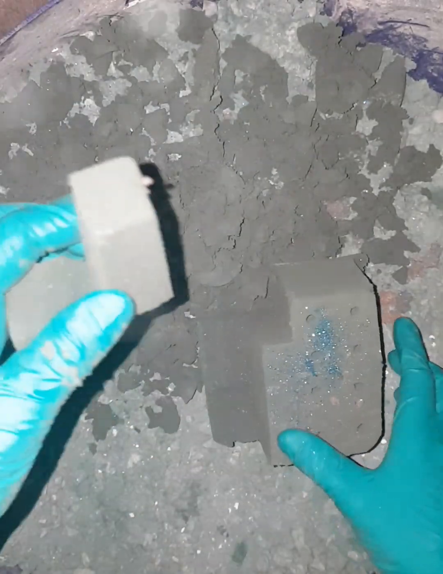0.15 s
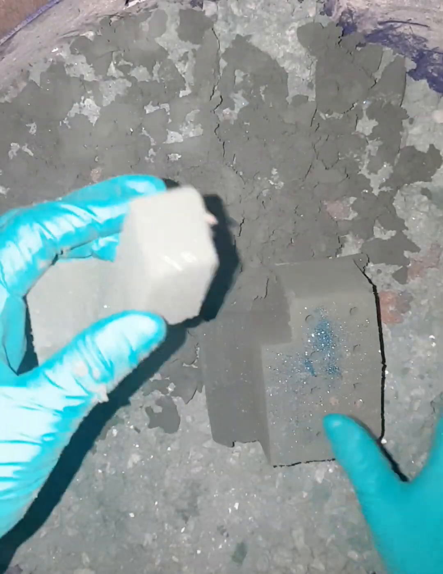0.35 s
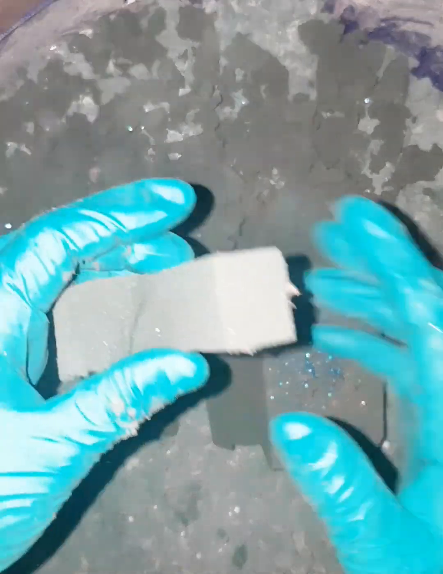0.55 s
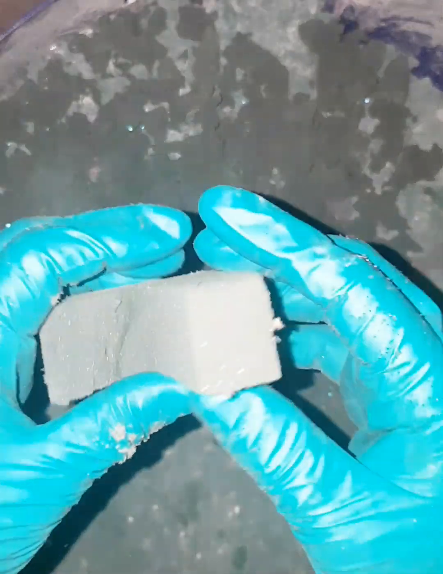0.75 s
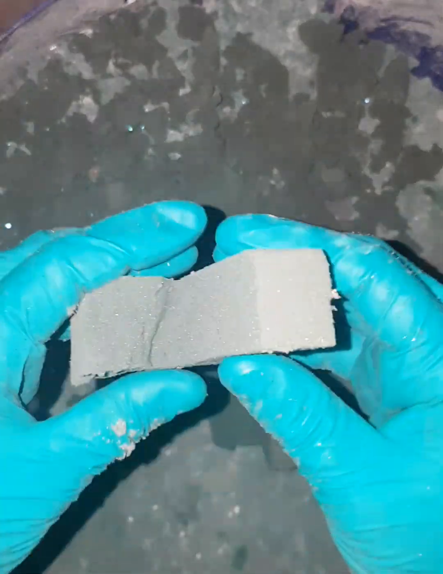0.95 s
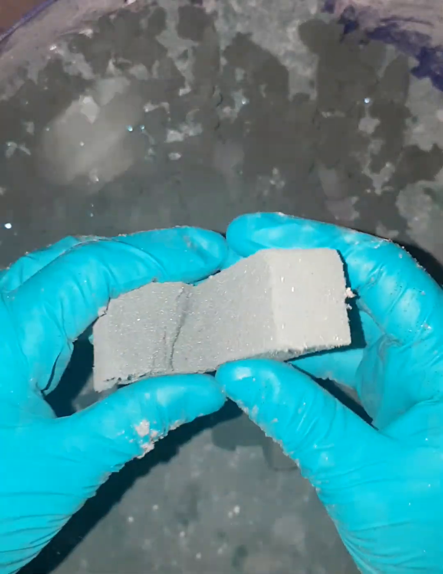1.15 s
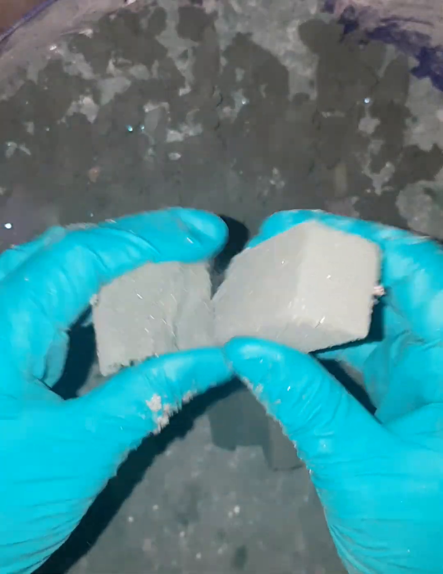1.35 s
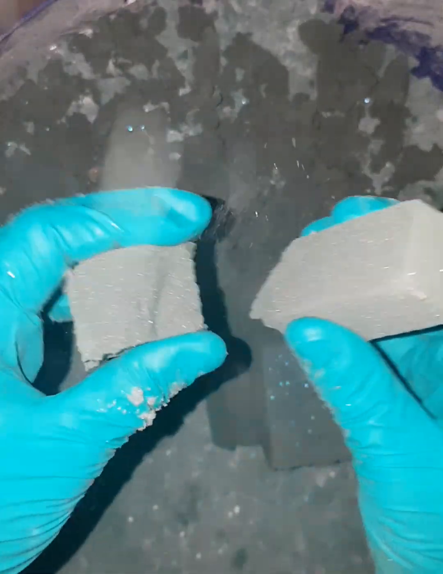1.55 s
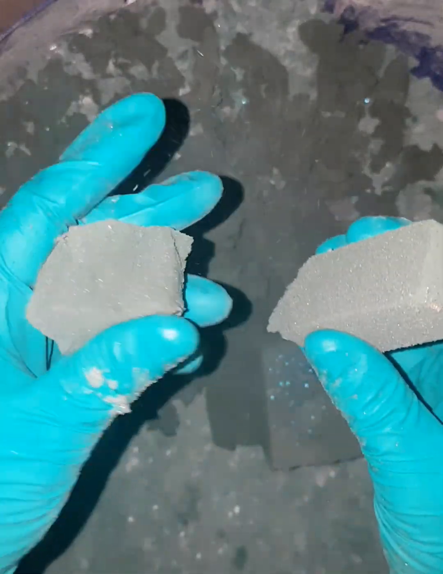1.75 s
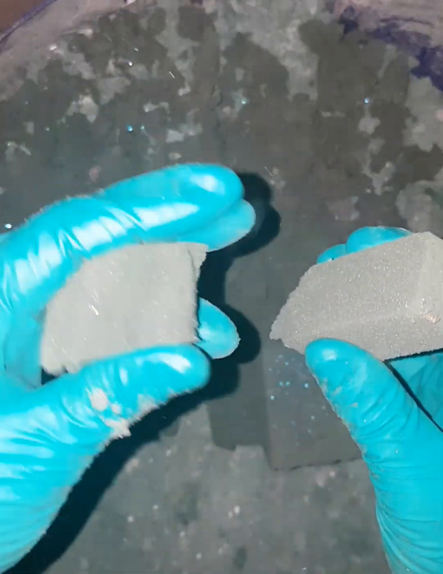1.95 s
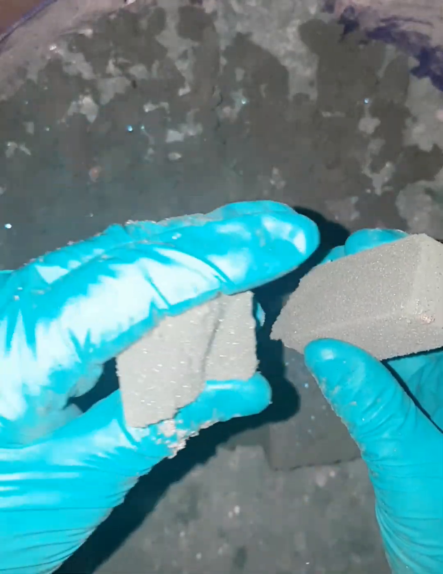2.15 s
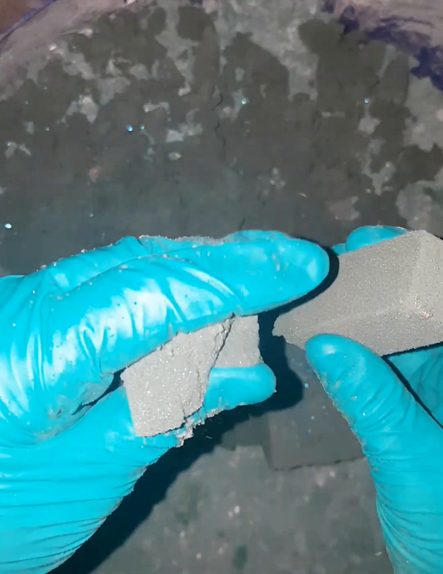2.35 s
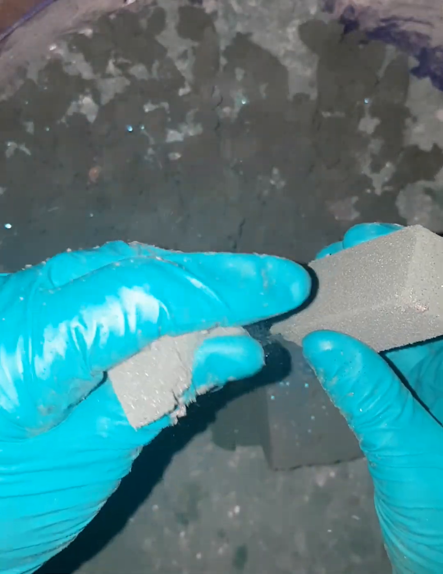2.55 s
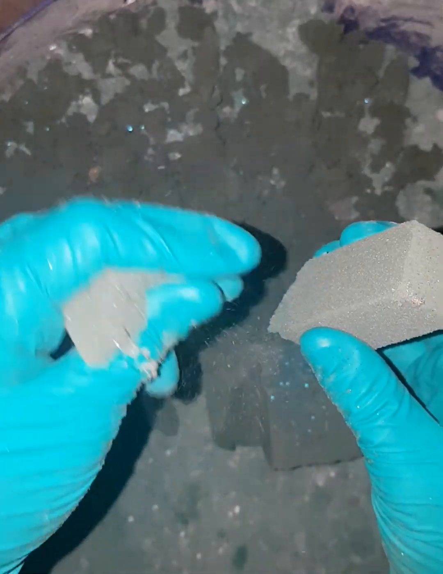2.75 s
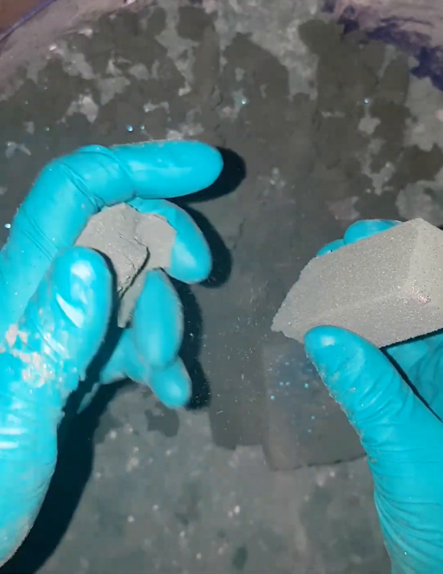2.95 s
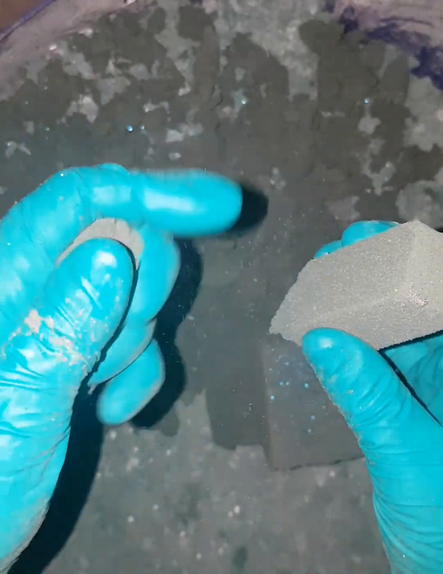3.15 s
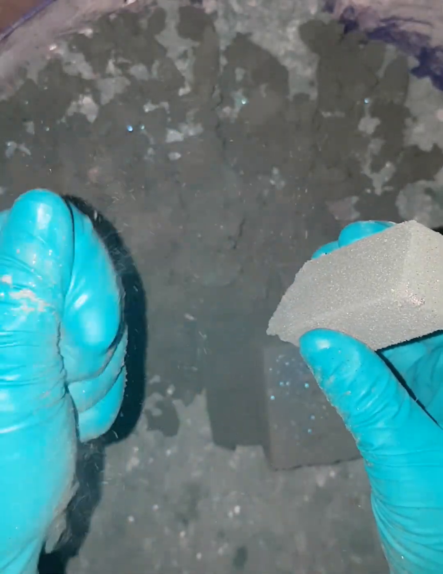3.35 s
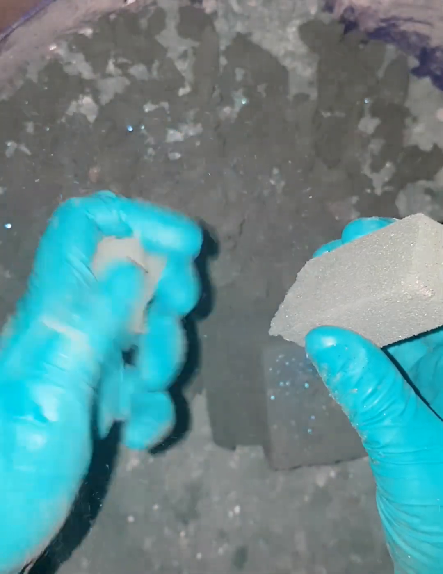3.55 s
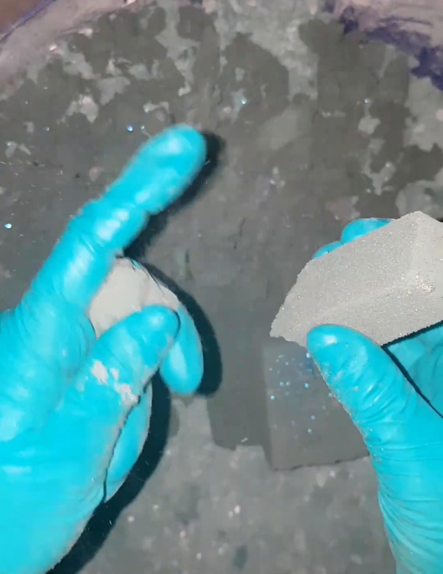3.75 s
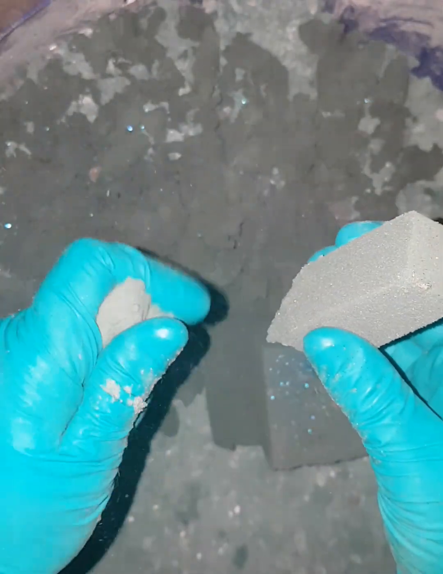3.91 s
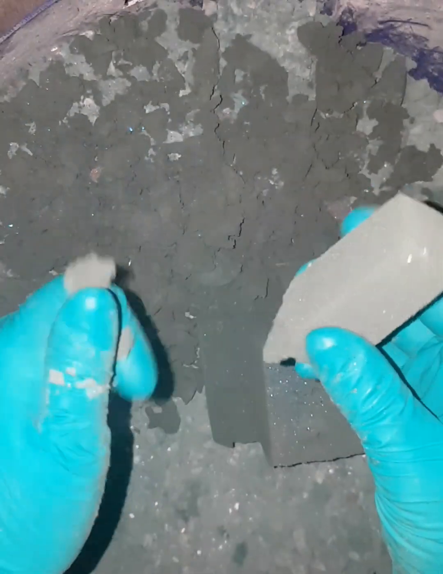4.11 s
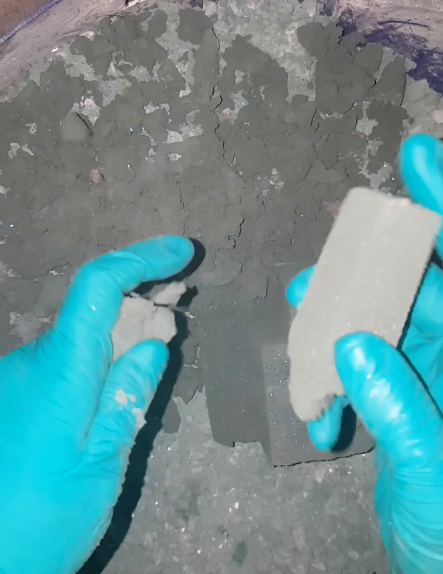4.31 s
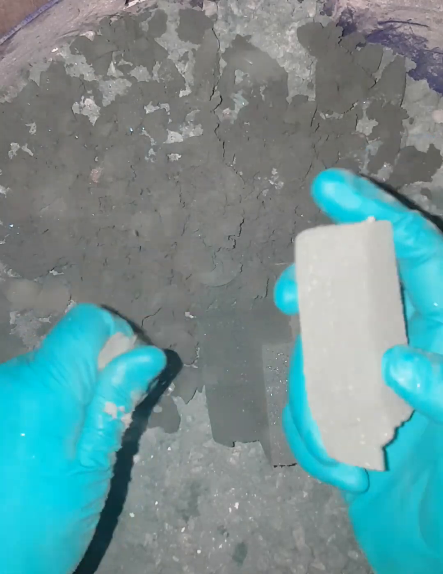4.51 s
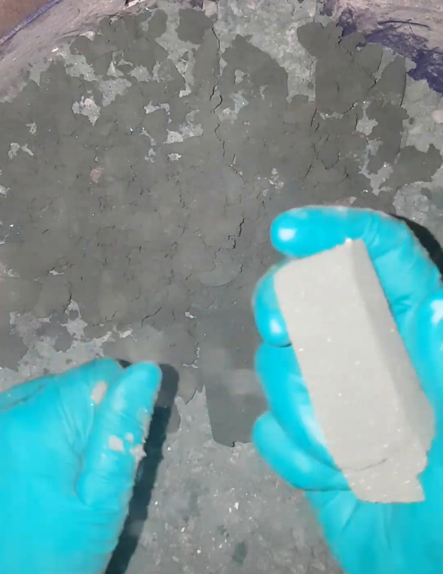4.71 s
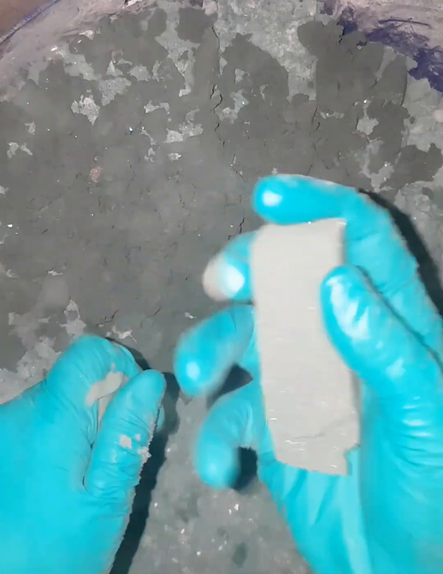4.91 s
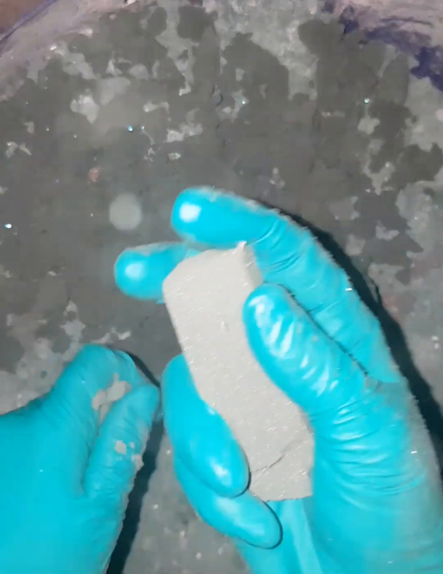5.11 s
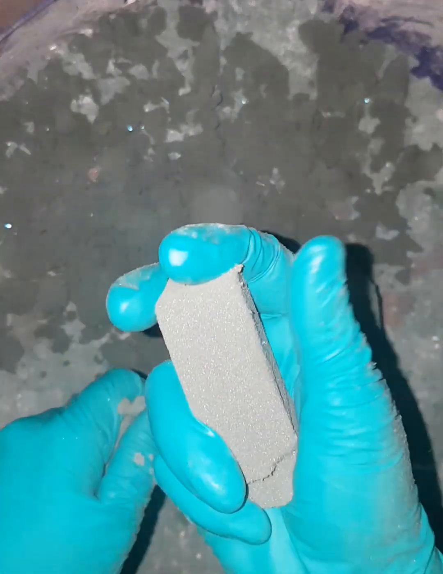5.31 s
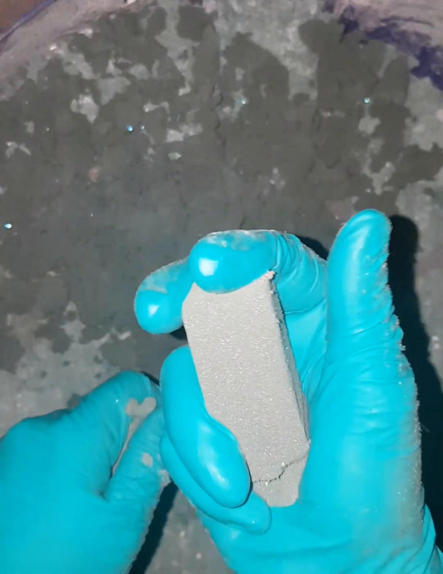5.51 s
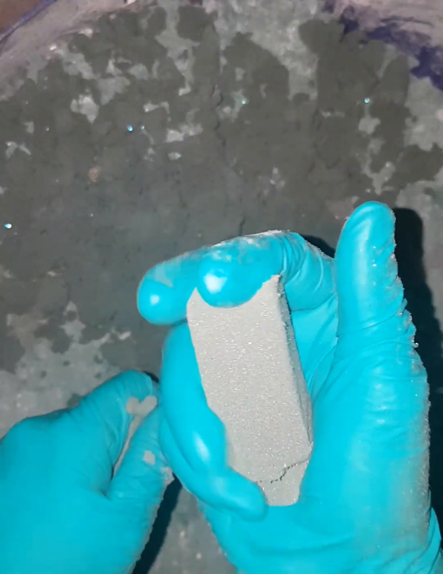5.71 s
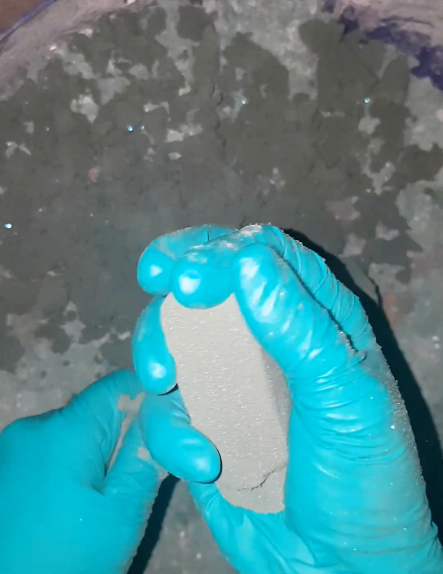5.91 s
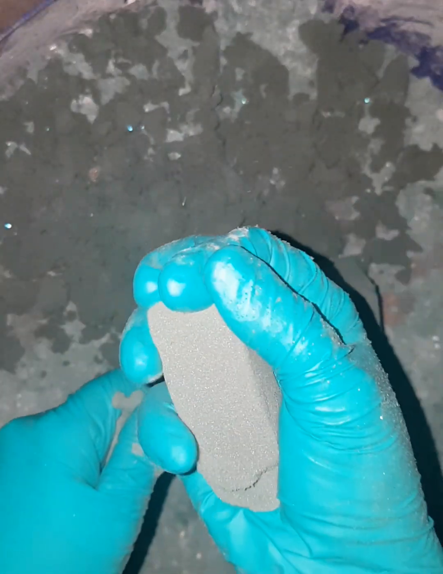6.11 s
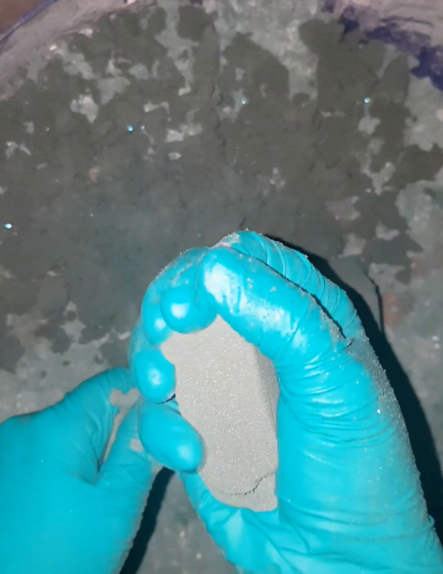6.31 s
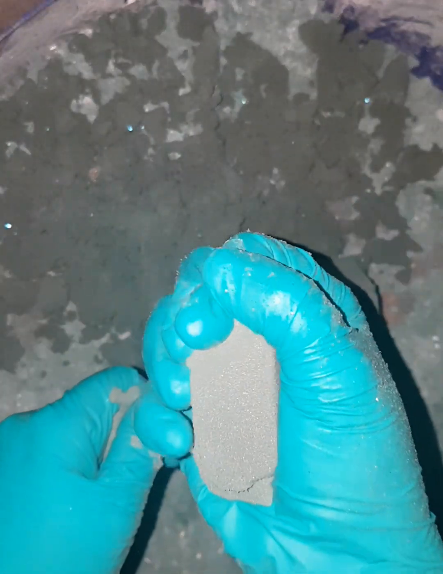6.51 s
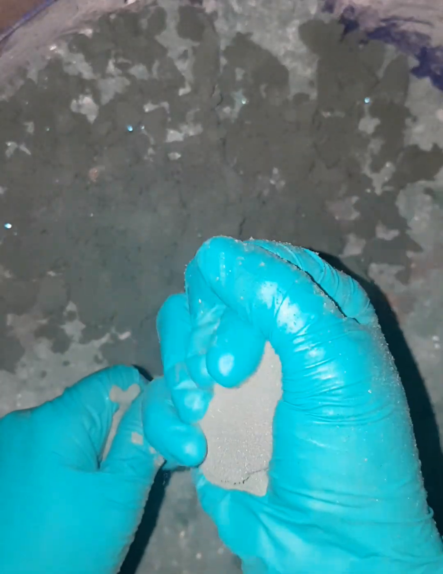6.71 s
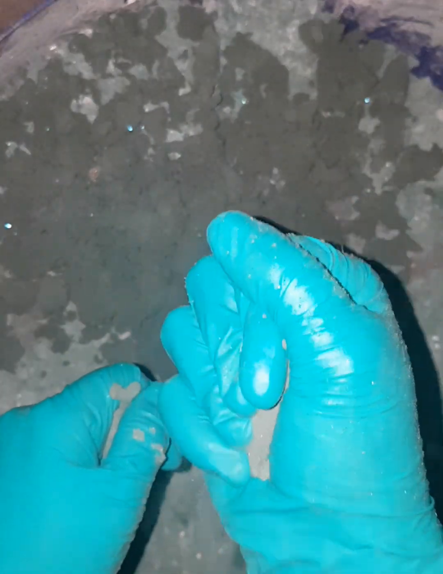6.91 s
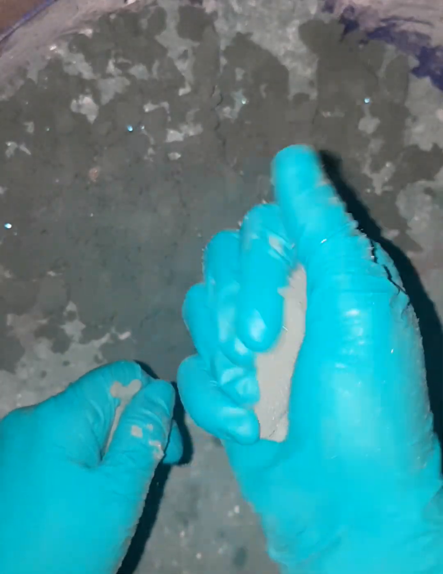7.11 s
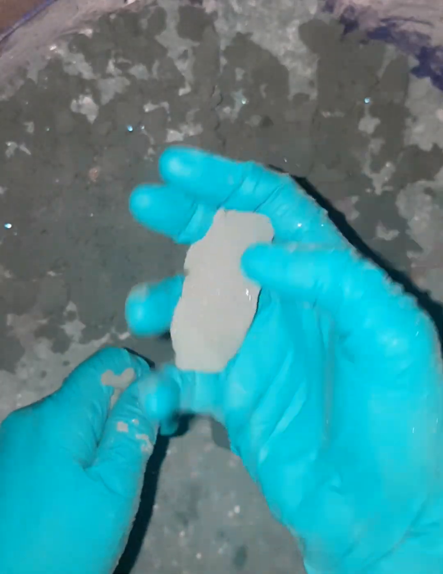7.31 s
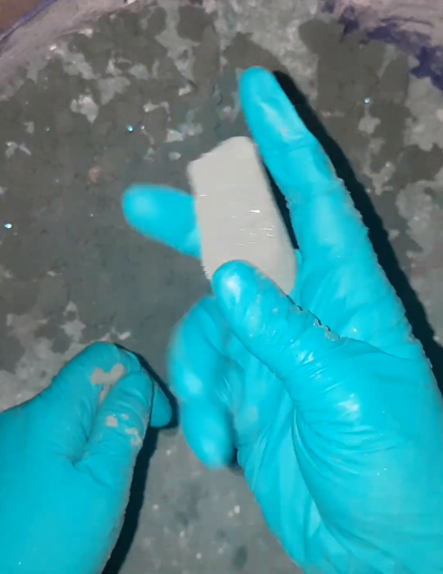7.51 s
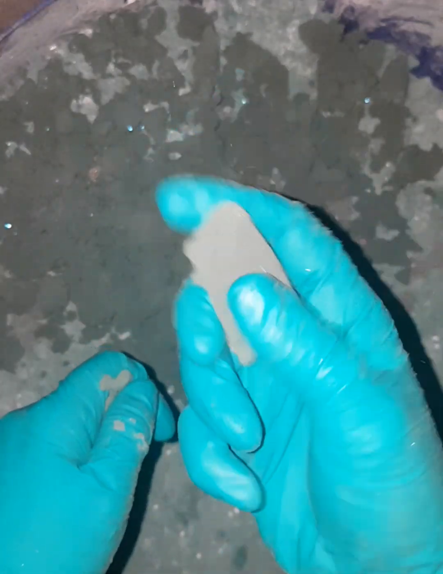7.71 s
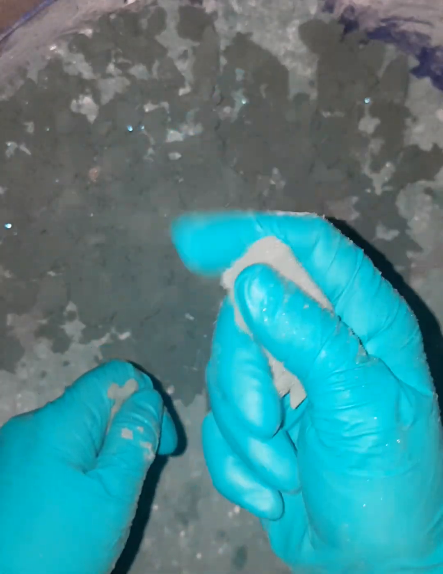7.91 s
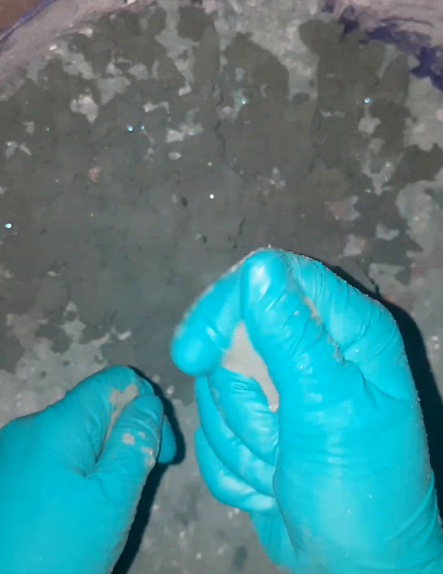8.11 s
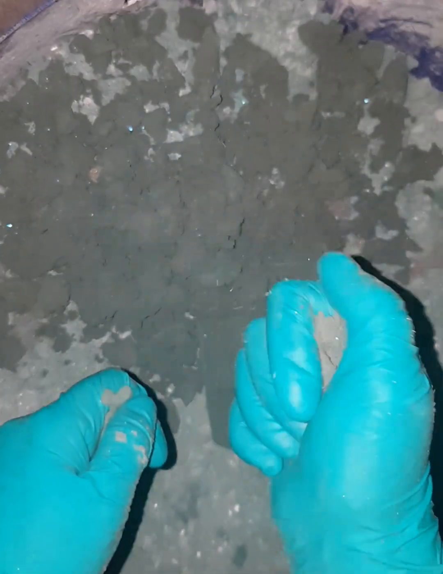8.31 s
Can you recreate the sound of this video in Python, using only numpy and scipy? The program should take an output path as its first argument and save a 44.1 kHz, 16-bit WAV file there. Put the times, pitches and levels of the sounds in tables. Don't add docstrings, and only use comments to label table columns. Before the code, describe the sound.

Very close, dry and mono: soft foam scratching swells into creaky crackle, then a bright splintering snap. Sandy crunches and small pops follow as one piece is squeezed, fading to light rubbing. A second squeeze builds through separate hard cracks to a crowded, full-scale crunch, then drops to brief papery scuffs over low room hum and microphone hiss.

```python
import sys
import numpy as np
from scipy import signal
from scipy.fft import rfft, irfft, next_fast_len
from scipy.io import wavfile
from scipy.ndimage import uniform_filter1d, map_coordinates

SR = 44100
rng = np.random.default_rng(int(sys.argv[2]) if len(sys.argv) > 2 else 0)


def bounce(signal):
    frames = np.transpose(np.atleast_2d(signal))
    limited = np.clip(frames, -1, 1)
    pcm = np.round(limited * 32767).astype(np.int16)
    wavfile.write(sys.argv[1], SR, pcm)


def ratio(d):
    e = np.asarray(d, float) / 20
    return 10 ** e


N = 368676
SLIT_HZ = 6350


def unit(x):
    return x / np.sqrt(np.mean(x ** 2) + 1e-20)


def along(points, hz):
    f, v = np.transpose(points)
    return np.interp(np.log(hz + 1), np.log(f + 1), v)


def curves(rows):
    s, *cols = np.transpose(rows)
    return [np.interp(np.arange(N) / SR, s, c) for c in cols]


def wobble(rate):
    knots = rng.standard_normal(int(N * rate / SR) + 4)
    return map_coordinates(knots, [np.arange(N) * rate / SR])


def filtered(x, response):
    m = 2 * next_fast_len(len(x) // 2 + 2048)
    return irfft(rfft(x, m) * response(np.fft.rfftfreq(m, 1 / SR)), m)[..., :len(x)]


def band(lo, hi):
    return lambda hz: 1 / np.sqrt((1 + (lo / (hz + 1)) ** 12) * (1 + (hz / hi) ** 12))


def resonance(centre_hz, width):
    return lambda f: 1j * f * width / (centre_hz ** 2 - f * f + 1j * f * width)


def crackle():
    grain_bands = [
        (2100, 5500),
        (5500, 9000),
        (9000, 11000),
        (250, 2100),
        (11000, 17000),
    ]
    # time in seconds, ring of the hollow hand in Hz, its strength in dB,
    # grit from 0 (rubbing) to 1 (crushing).
    grip = [(0, 4600, -3, 0.33), (.55, 4560, 5, .27), (.62, 2720, 7, 0.31), (.86, 2720, 3, .35),
            (1.15, 2720, -14.5, 0.52), (1.3, 4510, -5, 0.53), (1.9, 2960, 2.5, .2), (2.3, 3250, -1, .3),
            (2.5, 4900, -20, 0.33), (2.85, 3550, -7, 0.21), (3.9, 3200, 1.5, .16), (4.17, 4500, -7, .17),
            (4.22, 4550, 9.5, 0.19), (4.47, 4410, 9.5, .18), (4.56, 4400, -6, 0.17), (4.66, 4370, 3, .18),
            (4.85, 4200, 2.5, .2), (4.9, 4090, 12, .2), (4.97, 2860, 0.5, .15), (5.75, 2720, 1, .4),
            (6.3, 4510, -14, 0.55), (6.7, 3290, -17, 0.49), (7.4, 2780, 4, .2), (7.52, 3500, -3, 0.24),
            (8.36, 3980, 0, 0.14)]
    # time in seconds, dustiness in dB, bulk of the piece in dB.
    manner = [(0, -8, 6.5), (.6, 2, -0.5), (.85, -7, -2.5), (1.1, -3.5, 2.5), (1.33, 7.5, -22),
              (1.6, 0.5, 6), (2.0, 4.5, -11), (2.35, 11, -11), (2.6, 17, -11), (2.9, -4.5, 0.5),
              (3.3, -1.5, 8), (4.0, 5.5, -3), (4.7, 1, 2.5), (5.7, 1.5, -9), (6.5, -1, 1.5),
              (6.88, 11.5, 0), (7.45, -13, 3), (8.2, 10, 1)]
    # time in seconds, level in dB.
    sheen = [(0, 2.5), (1.5, 1.5), (1.65, 4), (1.78, 1), (1.96, 7.5), (2.15, 1.5), (3.0, 4), (3.2, 7),
             (3.45, -1.5), (8.36, -2.5)]
    # time in seconds, level in dB.
    air = [(0, -6), (.6, -6), (1.9, -9.5), (2.5, -5.5), (3.2, -6.5), (4.2, -2), (4.8, 0), (7.4, -1),
           (7.6, 0.5), (8.15, -4.5), (8.36, -21)]
    # share in dB, then dB per dB of dustiness, of bulk,
    # of openness and of force.
    fine = (-13, 1.27, 1.1, 1.04, -0.1)
    finest = (-13, 0.6639, 0.23, -0.04, -0.1525)
    coarse = (-14, 0.03, 1, 1.03, 0.14)
    usual_force_db = -48

    ring_hz, ring_db, grit = curves(grip)
    force_db, openness = strokes()
    state = [np.ones(N), *curves(manner), openness, force_db - usual_force_db]
    fine_db, finest_db, coarse_db = np.array([fine, finest, coarse]) @ state
    air_db = finest_db - 0.5 + curves(air)[0]
    shares = [0, fine_db, finest_db + curves(sheen)[0], coarse_db, air_db]

    cells = ruptures(grit)
    cells /= np.sqrt(np.abs(uniform_filter1d(cells ** 2, size=2500)))
    cells = cupped(filtered(cells, housing), ring_hz * ratio(0.12 * wobble(15)), ring_db)
    mix = 0
    for (lo, hi), share_db in zip(grain_bands, shares):
        grains = unit(filtered(cells, band(lo, hi)))
        mix = mix + ratio(share_db + 0.43 * wobble(40)) * grains
    return ratio(force_db) * mix


def strokes():
    # peak time in seconds, peak level in dB, rise in ms, fall in ms,
    # openness of the hand in dB. Both hands bend the block:
    bending = [(.29, -55, 17, 18, 4.5), (.626, -55, 28, 8.2, -13), (.654, -50.5, 1.2, 15, 8),
               (.673, -41, 8, 12.6, 8.5), (.707, -44, 12, 15, 8.5), (.767, -42, 44, 17, 1.5),
               (.835, -38.5, 27, 28, -4), (.978, -51, 110, 11, 5.5), (1.017, -43.5, 13, 14.4, -0.5),
               (1.066, -45.5, 11, 15, -1.5), (1.132, -51.5, 33, 19, 8.5), (1.189, -57.5, 19, 16, 4),
               (1.318, -47, 2.5, 11, -10), (1.334, -36, 10, 12, -15), (1.358, -20.5, 5, 11, -1.5),
               (1.38, -46.5, 7.7, 22, 10)]
    left_crush = [(1.639, -52, 66, 29, 0), (1.7, -50, 5.1, 12.4, 2.5), (1.92, -49.5, 83, 73, 0),
                  (2.13, -55, 67, 80, 5), (2.27, -45.5, 54, 71, 5), (2.305, -37, 6, 4.2, -16),
                  (2.34, -37.5, 30, 42, 1), (2.463, -46.5, 40, 46, 3), (2.535, -48, 44, 32, 8),
                  (2.6, -55.5, 28, 46, -8.5), (2.822, -49, 27.4, 63, 4.5), (2.907, -37.5, 19, 5.4, 1),
                  (2.93, -51.5, 15, 25, 0), (3.14, -52, 94, 170, 1.5), (3.209, -40.5, 38, 37, -12.5),
                  (3.594, -53, 7.8, 6.5, -4), (3.896, -57, 110, 16, 7.5), (3.991, -47.5, 36, 67, 4),
                  (4.106, -52.5, 3, 18, 10), (4.225, -45.5, 9.4, 34, 4), (4.33, -46, 41, 42, 6),
                  (4.461, -47.5, 92, 37, 3.5)]
    right_crush = [(4.662, -37.5, 14.4, 15.4, 5), (4.68, -35, 10, 5.2, -3), (4.816, -42, 7.9, 16.3, 9),
                   (4.895, -35, 7, 18, 3.5), (4.967, -42.5, 94, 65, 5), (5.175, -44, 44, 79, 7),
                   (5.346, -49, 56, 15, 3), (5.433, -49, 16, 7.6, -1), (5.598, -46.5, 280, 2.4, 11.5),
                   (5.642, -37.5, 21.7, 24, 12.5), (5.746, -34, 36, 28.4, 10), (5.893, -48.5, 7.7, 5.9, 11),
                   (6.004, -48.5, 76, 93, 7.5), (6.077, -46.5, 5.4, 19, 7), (6.274, -39, 67, 32, 1.5),
                   (6.442, -40.5, 140, 22, -1.5), (6.589, -34, 31, 57, -4.5), (6.645, -38, 4.9, 9.7, 1),
                   (6.75, -38.5, 92, 5.7, -3), (6.828, -37.5, 104, 39, -1.5)]
    regrip = [(7.155, -53, 34, 42, 7), (7.268, -57, 15, 9.4, -1), (7.406, -46, 37, 4.1, -4.5),
              (7.458, -59, 3.1, 45, 1), (7.483, -50.5, 2.5, 4, -3), (7.522, -45.5, 7.6, 24, 0),
              (7.564, -47, 13, 20, -2), (7.7, -45, 58, 6.8, 2.5), (7.777, -43, 36, 7.6, 4.5),
              (7.864, -48.5, 57, 44, -1), (7.938, -40.5, 18, 39, 0.5), (8.041, -45.5, 18, 51, 1),
              (8.104, -52, 12, 180, -2.5), (8.219, -49.5, 15, 45, 0)]
    # time in seconds, level in dB.
    contact = [(0.0, -63), (0.15, -73.5), (0.55, -69.5), (0.9, -72), (1.3, -53), (1.5, -68.5), (2.05, -71),
               (2.73, -81), (3.0, -71.5), (3.4, -60), (3.85, -59), (4.6, -56.5), (5.5, -73), (5.85, -57.5),
               (6.5, -42), (7.0, -70), (7.44, -67), (8.36, -75)]
    drop_db, roundness = 6, 1.51

    ms = 1000 * np.arange(0, N + 64, 64) / SR
    rows = bending + left_crush + right_crush + regrip
    s, peak_db, rise, fall, openness = np.transpose(rows)[..., None]
    late = ms - 1000 * s
    span = np.where(late < 0, abs(rise) + .1, abs(fall) + .1)
    power = ratio(2 * (peak_db - drop_db * np.abs(late / span) ** roundness))
    total = power.sum(axis=0) + ratio(2 * np.interp(ms / 1000, *np.transpose(contact)))
    mean_openness = (power * openness).sum(axis=0) / total
    return curves(np.transpose([ms / 1000, 10 * np.log10(total), mean_openness]))


def ruptures(grit):
    chance = rng.random(N)
    size = np.minimum(rng.exponential(1, N), 2.5)
    starts = (chance < 400 / SR) * ratio(4.3 * size)
    u = np.arange(SR // 200) / SR / 0.00029
    clusters = np.abs(signal.fftconvolve(starts, u * np.exp(1 - u))[:N])
    swell = ratio(0.85 * wobble(60) + 1.1 * wobble(300))
    return swell * (1 + 1.6 * np.clip(grit, 0, 1.5) ** 2 * clusters) * rng.standard_normal(N)


def cupped(cells, centre, strength_db):
    hollow_hz = [2700, 3200, 3800, 4500, 5100]
    # time in seconds, strength in dB.
    slit = [(0, -1.5), (.7, 0), (1.5, -1.5), (2.4, -4.5), (3.2, -1.5), (4.4, -1.5), (4.85, -2), (5.1, 1),
            (6.0, 2), (6.5, -8), (6.72, -4.5), (6.9, 6.5), (7.1, -10.5), (8.36, -9.5)]
    rung = 0
    for hz in hollow_hz:
        nearness = np.exp(-(np.log(centre / hz) / 0.084) ** 2)
        rung = rung + nearness * filtered(cells, resonance(hz, width=320))
    whistle = ratio(curves(slit)[0]) * filtered(cells, resonance(SLIT_HZ, width=900))
    coloured = cells + ratio(strength_db) * rung + whistle
    return coloured / np.sqrt(1 + 0.44 * ratio(strength_db) + 0.21 * ratio(2 * strength_db))


def patchy(x, depth_db):
    z = signal.stft(x, nperseg=256)[2]
    field = uniform_filter1d(rng.standard_normal(z.shape), size=5, axis=0)
    field = uniform_filter1d(field, size=14, axis=1)
    return signal.istft(z * ratio(depth_db * unit(field)), nperseg=256)[1][:N]


def snaps():
    bowl_s, bowl_db, bowl_hz = .0024, -21.5, 3500
    out = np.zeros(N + SR)
    t = np.arange(SR // 32) / SR
    push = t / .0001 * np.exp(-t / .0001)
    jolt = filtered(push, lambda f: housing(f) * resonance(1600, width=1200)(f) ** 2)
    thud = filtered(push, lambda f: -.3 * resonance(750, width=800)(f) - 0.02 * resonance(220, width=400)(f))
    thud = thud / np.abs(jolt).max()
    jolt = jolt / np.abs(jolt).max()
    for s, db, tone_hz, ms, jolt_db, second_hz, second_db, bright_db, thud_db, clean, steep in all_snaps():
        crack = torn_wall(t, tone_hz, ms, second_hz, second_db, bright_db, clean, steep)
        block = ratio(jolt_db - 8.0) * (jolt + ratio(thud_db) * thud)
        out[round(s * SR):][:len(t)] += ratio(db + 0.64) * (crack + block)

    def bowl(f):
        return 1 + ratio(bowl_db) * np.exp(-2j * np.pi * f * bowl_s) / (1 + 1j * f / bowl_hz) ** 2

    return filtered(out[:N], bowl)


def torn_wall(t, tone_hz, ms, second_hz, second_db, bright_db, clean, steep):
    u = t / (0.00037 * np.clip(ms, .5, 6))
    tear = u ** 0.15 * np.exp(-.75 * u) + 0.035 * ratio(-60 * t / 0.025)
    burst = tear * rng.standard_normal(len(t)) + clean * (t == 0)
    piece = resonance(tone_hz, width=0.3 * tone_hz)
    second = resonance(second_hz, width=0.11 * second_hz)

    def colour(f):
        thin = (1j * f / (.47 * tone_hz + 1j * f)) ** 2
        body = (.4 + piece(f)) / (1 + 1j * f / (tone_hz + 1800 * ms)) ** steep
        treble = ratio(bright_db) * 0.22 * resonance(9600, width=3500)(f) ** 2
        return housing(f) * thin * (body + treble - 1j * ratio(second_db) * second(f))

    crack = filtered(burst, colour)
    return crack / np.abs(crack).max()


def all_snaps():
    # time in seconds, peak in dB, piece tone in Hz, tear length in ms.
    break_snaps = [
        (1.3375, -15, 3140, 2.8),
        (1.3507, -8.5, 4720, 1.1),
        (1.3521, -0.5, 5850, 1),
        (1.3531, -1.5, 5400, 0.79),
        (1.3557, -8, 6310, 1.2),
        (1.3576, -8.5, 6100, 1.4),
        (1.3612, -13, 6100, 1.5),
        (1.3665, -15, 4400, 1.5),
        (1.37, -13, 3120, 1.1),
        (1.3752, -17, 3550, 1.8),
    ]
    left_snaps = [(2.1665, -31, 3000, 1.7), (2.2335, -23.5, 3180, 3.6), (2.248, -18, 5900, 2),
                  (2.2497, -14.5, 5000, 1.2), (2.3022, -22, 5120, 2.1), (2.3053, -15, 3320, 1.2),
                  (2.3735, -19.5, 6300, 0.99), (2.4429, -17.5, 3300, 1.9), (2.4646, -15, 3140, 1.3),
                  (3.218, -25.5, 3500, 1.2), (3.2258, -26, 6480, 1.4)]
    crumble_snaps = [(5.656, -23, 5810, .9), (5.673, -23, 6350, 3.7), (6.2345, -20, 4580, 1.8),
                     (6.2679, -24, 3060, 0.79), (6.3065, -23, 3010, 3.5), (6.3945, -24, 4700, 1.4),
                     (6.4705, -23, 4600, 2.8), (6.5022, -18.5, 4350, 1.8), (6.5812, -24.5, 4500, 4),
                     (6.61, -18, 4400, 2.3), (6.629, -28, 3980, 1.5), (6.6482, -19, 6500, 3),
                     (6.6754, -17, 6300, 3.7), (6.711, -19, 5990, 1.5), (6.7275, -16.5, 6350, 1.1),
                     (6.7403, -24, 6570, 1.1), (6.7477, -16, 3140, 0.96), (6.7533, -15, 6400, 1.2),
                     (6.7665, -20, 6330, 1.5), (6.792, -19, 3100, 1.9), (6.8064, -19, 6100, 2.5),
                     (6.8623, -19.5, 6500, 1.2), (7.1182, -36.5, 1370, 1.8), (7.463, -42, 2980, 6)]
    cell_pops = [(0.6698, -37, 2780, 1.2), (1.016, -44, 3080, 1.4), (1.0641, -34, 4260, 1.2),
                 (1.3172, -30, 6030, 1.2), (1.3198, -35, 4480, 1.2), (2.176, -31, 3140, 0.98),
                 (2.2897, -32, 2890, 1.2), (2.3247, -23, 3790, 1.2), (2.3389, -23, 5170, 1.2),
                 (2.3467, -29, 6330, 1.2), (2.3654, -24, 6160, 1.2), (2.3879, -25, 6240, 1.2),
                 (2.3932, -37, 3270, 1.2), (2.5277, -29, 6330, 1.1), (2.9028, -23, 4170, 1.5),
                 (2.9053, -28, 3270, 1.7), (2.9088, -18, 3650, 1.3), (3.1685, -29, 3190, 1.2),
                 (3.2047, -23.5, 3630, 1.3), (3.8924, -40, 5810, 1.1), (4.6628, -25, 4520, 1.2),
                 (4.8895, -29, 4090, 1.2), (4.894, -20.5, 4130, 1.9), (4.8981, -19, 6160, 1.2),
                 (4.9006, -18, 6460, 1.4), (4.9034, -20, 4050, 1), (4.9062, -26, 4220, 1.2),
                 (4.9587, -26, 3270, 1.2), (4.9648, -24.5, 2800, 1.2), (5.2712, -35, 6300, 0.37),
                 (5.327, -37, 4870, 1.2), (5.4886, -43, 5830, 1.2),
                 (5.6223, -30, 5430, 1.3), (5.633, -27, 6330, 1.2), (5.7235, -20, 2760, 1.2),
                 (5.9635, -31, 6070, 1.2), (6.0006, -34, 4650, 1.2), (6.012, -29, 2970, 1.2),
                 (6.242, -24, 3320, 1.3), (6.2443, -27, 4740, 1.2), (6.2748, -28, 2930, 1.2),
                 (6.279, -31, 3230, 1.2), (6.288, -30, 4010, 1.2), (6.293, -28, 6240, 1.2),
                 (6.316, -26, 6290, 1.2), (6.3779, -34, 4090, 1.2), (6.4125, -34, 4820, 1.2),
                 (6.4464, -32, 4820, 1.2), (6.4658, -26, 2970, 1.2), (6.478, -40, 4570, 1.2),
                 (6.5245, -24, 6120, 1.2), (6.5327, -27, 4130, 1.2), (6.543, -27, 2890, 1.2),
                 (6.563, -20, 4220, 1.2), (6.619, -20, 6500, 1.3), (6.6313, -21, 5990, 1.2),
                 (6.6786, -22, 6290, 1.2), (6.6879, -26, 6030, 1.2), (6.718, -19, 6500, 1.2),
                 (6.723, -21, 6330, 1.4), (6.733, -20, 3400, 1.1), (6.7614, -22, 3450, 1.1),
                 (6.775, -21, 3490, 1.2), (6.8038, -17, 3360, 1.3), (6.816, -23, 3620, 1.2),
                 (6.821, -17, 3570, 1.2), (6.8241, -23, 5560, 1.2), (6.8271, -15.5, 3790, 1.3),
                 (6.834, -20, 5560, 1.2), (6.836, -16, 5170, 1.2), (6.843, -16, 6100, 1),
                 (6.848, -20, 5860, 1.2), (6.858, -17, 6160, 1.4), (6.8844, -34, 6420, 1.2),
                 (6.8908, -27, 6240, 1.2), (7.5254, -32, 3360, 1.2), (7.936, -32, 5380, 1.2),
                 (7.957, -27, 3450, 1.3)]
    # time in seconds, peak in dB, piece tone in Hz,
    # tear length in ms, jolt of the block in dB.
    deep_cracks = [
        (5.638, -9, 2860, 2, -4.5),
        (5.7826, -6.5, 2530, 2.1, -25),
        (5.9345, -2.5, 2900, 0.89, -10.5),
        (6.2597, -6.5, 2900, 1.9, -12),
        (6.5661, 3, 2650, 1.4, -18.5),
        (6.5899, 0.5, 4600, 1.6, -24),
        (6.5931, -11, 4630, 1.4, -15.5),
        (6.6062, -5, 4680, 4, -12),
        (6.6406, 4.5, 2800, 0.3, -14),
    ]
    # second tone in Hz, its level in dB, treble in dB, thud in dB.
    tears = [(4900, -6, 1, -28), (4400, -3, 13, -12), (4470, -3.5, -28, -30), (4200, -4, -3, -28),
             (6500, -3.5, -0.5, 11.5), (3000, -15, -8, 2), (6300, -10, -5, -9), (6400, -16, -8, -9),
             (4400, -18, -4, -15)]
    # its rows, jolt of the block dB, ring of the finger slit dB, treble of the tear dB
    kinds = [(break_snaps, -27.5, -16, -4.5),
             (left_snaps, -23, -2.5, 14.5),
             (crumble_snaps, -13, -15, -11),
             (cell_pops, -22, -15, -4)]
    clean_deep, steep_deep = 14, 3
    clean_small, steep_small = 4.5, 2.1

    snap_list = [(*row, *tear, clean_deep, steep_deep) for row, tear in zip(deep_cracks, tears)]
    for rows, jolt_db, slit_db, bright_db in kinds:
        for row in rows:
            snap_list.append((*row, jolt_db, SLIT_HZ, slit_db, bright_db, -1, clean_small, steep_small))
    return snap_list


def halves():
    # time in seconds, ring level in dB.
    s, ring_db = (1.352, -40)
    # centre in Hz, width in Hz, level in dB, 60 dB decay in seconds.
    rings = [
        (140, 240, 2, 0.052),
        (1780, 300, 14.5, 0.057),
        (1900, 650, 0, 0.28),
    ]
    t = np.arange(N) / SR - s
    out = 0
    for hz, width, db, t60 in rings:
        shake = unit(filtered(rng.standard_normal(N), lambda f: resonance(hz, width)(f) ** 2))
        out = out + ratio(ring_db + db - 60 * np.abs(t) / t60) * shake
    return (t > 0) * out


def groan():
    # time in seconds, level in dB, half length in seconds, centre in Hz, width in Hz.
    creaks = [
        (0.842, -46.5, 0.0073, 1580, 200),
        (0.864, -54, 0.0092, 1570, 200),
        (0.865, -54, 0.0073, 202, 150),
        (6.836, -47, 0.059, 696, 700),
        (7.51, -53, 0.012, 124, 90),
    ]
    lumps = ratio(3 * wobble(90)) * rng.standard_normal(N)
    t = np.arange(N) / SR
    out = 0
    for s, db, length, hz, width in creaks:
        tone = unit(filtered(lumps, lambda f: resonance(hz, width)(f) ** 2))
        out = out + ratio(db) * np.exp(-((t - s) / length) ** 2) * tone
    return out


def handling():
    # time in seconds, level in dB, half length in seconds.
    thumps = [(0.673, -53.5, 0.015), (0.754, -57, 0.069), (0.854, -56, 0.038), (1.338, -59, 0.011),
              (2.358, -67, 0.06), (3.268, -64.5, 0.11), (4.245, -57.5, 0.031), (4.332, -56, 0.024),
              (4.655, -57, 0.037), (4.923, -60, 0.14), (5.72, -71, 0.024), (6.274, -63, 0.037),
              (6.434, -65, 0.13), (6.6, -57.5, 0.056), (6.818, -55.5, 0.11), (7.532, -59, 0.015),
              (7.777, -57, 0.019)]
    t = np.arange(N) / SR
    pressure = sum(ratio(db) * np.exp(-((t - s) / length) ** 2) for s, db, length in thumps)
    lumps = ratio(1.5 * wobble(40)) * rng.standard_normal(N)
    return pressure * unit(filtered(lumps, lambda f: resonance(230, width=520)(f) ** 2))


def room():
    # frequency in Hz, level in dB per Hz.
    spectrum = [(20, -10), (60, -1.5), (120, 0.5), (250, -1.5), (450, -5.5), (1000, -10.5), (3000, -14),
                (7000, -30.5), (10000, -26.5), (16000, -27)]
    hum = unit(filtered(rng.standard_normal(N), lambda hz: ratio(along(spectrum, hz))))
    return ratio(-64.0 + 0.43 * wobble(3.4)) * hum


def housing(hz):
    # frequency in Hz, level in dB.
    broad = [(100, -42.5), (600, -10.5), (1500, 2), (2800, 3), (4500, 1.5), (6400, 1.5), (7800, -1.5),
             (9900, -6), (11500, -21), (13000, -19), (15500, -20.5), (20000, -34)]
    # centre in Hz, width in Hz, depth in dB.
    dips = [(2065, 534, 14), (5480, 250, 6), (7290, 203, 15.5), (8800, 1020, 13.5), (10700, 500, 5),
            (14500, 340, 8.5)]
    db = along(broad, hz) - sum(depth_db / (1 + ((hz - c) * 2 / w) ** 2) for c, w, depth_db in dips)
    cepstrum = irfft(np.log(ratio(db)))
    half = len(cepstrum) // 2
    cepstrum[1:half] *= 2
    cepstrum[half + 1:] = 0
    return np.exp(rfft(cepstrum))


def scene():
    bed = crackle()
    rest = snaps() + halves() + groan() + handling() + room()
    return (patchy(bed, depth_db=1.5) + rest)[None]


def low_pass(x):
    return signal.sosfilt(signal.butter(12, 17010, fs=SR, output="sos"), x)


def record(dry):
    def rolloff(hz):
        return ratio(-32 / (1 + np.exp(np.clip((15850 - hz) / 40, -50, 50))))

    narrow = filtered(dry[0], rolloff)
    clipped = narrow / (1 + np.abs(narrow) ** 12) ** (1 / 12)
    mix = clipped[None] - .0009
    return low_pass(mix)


dry = scene()
out = record(dry)
bounce(out)
```